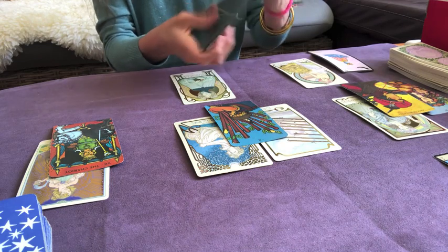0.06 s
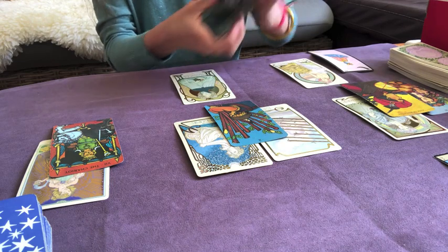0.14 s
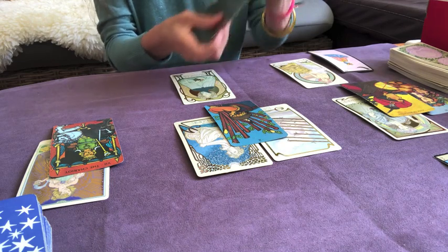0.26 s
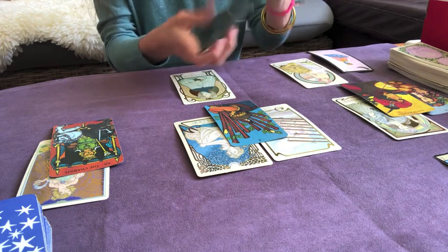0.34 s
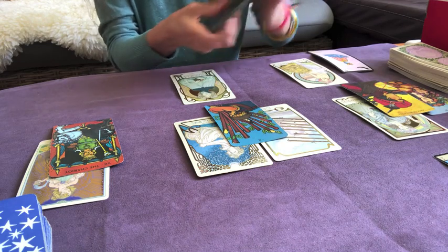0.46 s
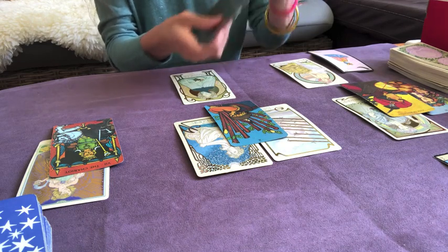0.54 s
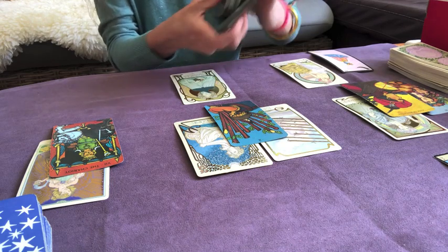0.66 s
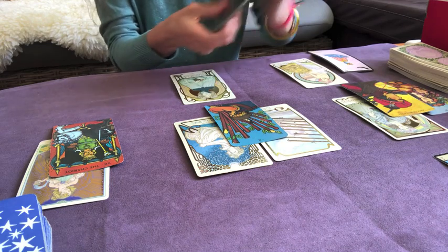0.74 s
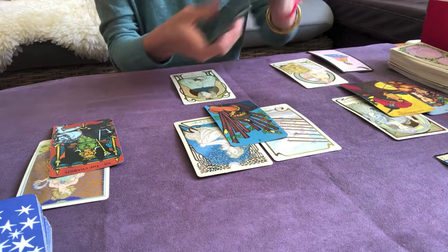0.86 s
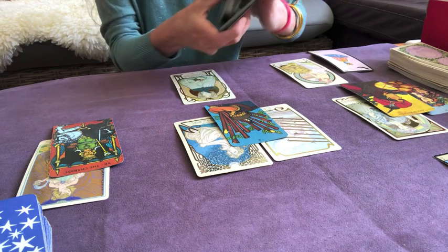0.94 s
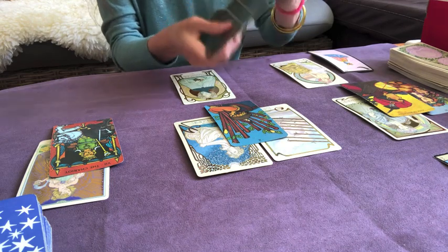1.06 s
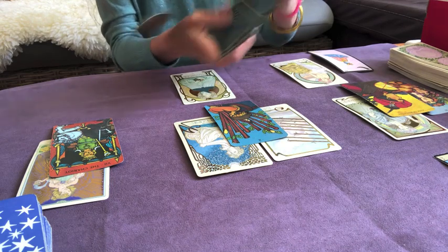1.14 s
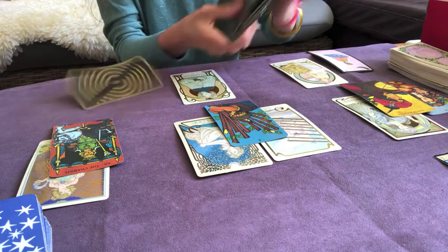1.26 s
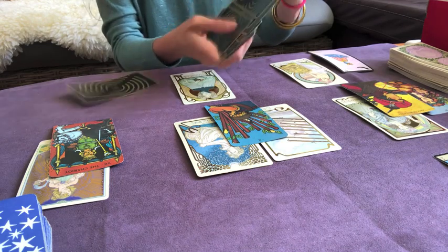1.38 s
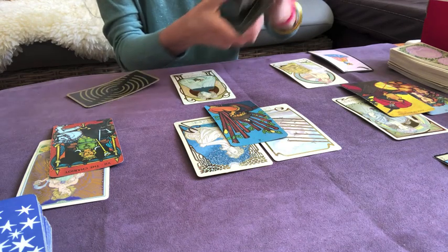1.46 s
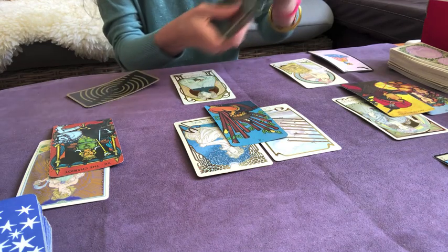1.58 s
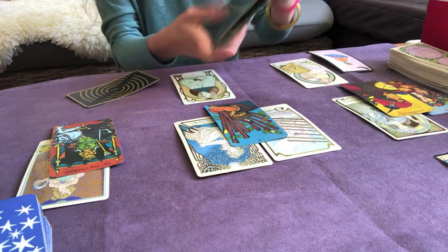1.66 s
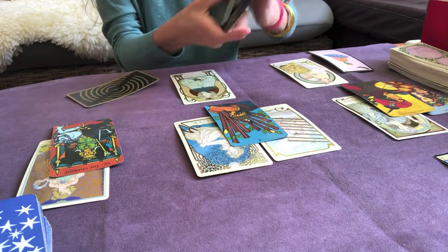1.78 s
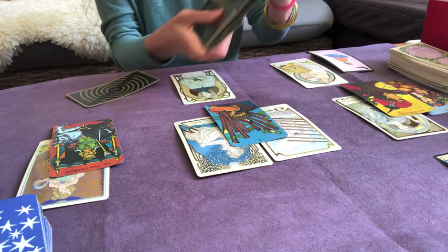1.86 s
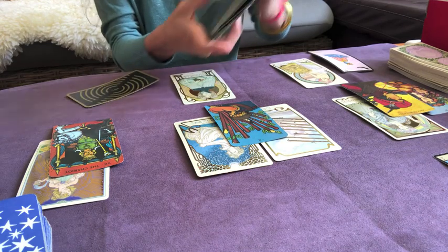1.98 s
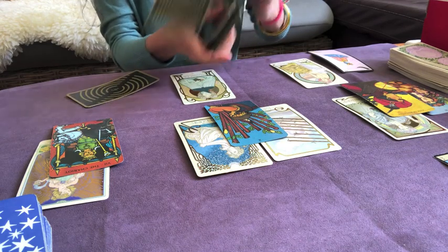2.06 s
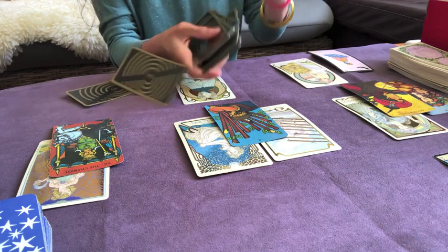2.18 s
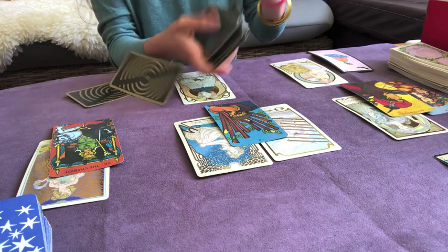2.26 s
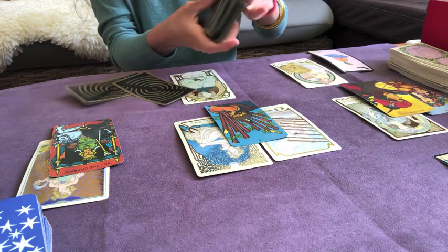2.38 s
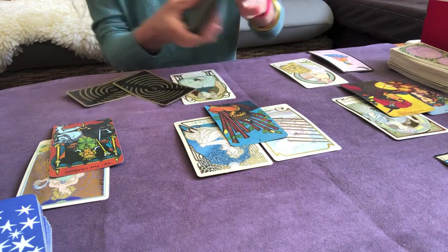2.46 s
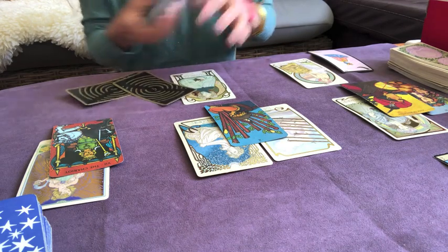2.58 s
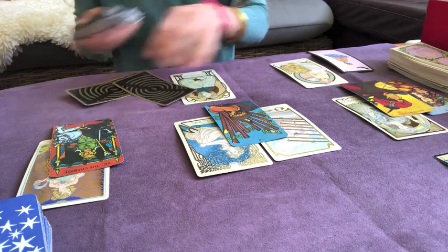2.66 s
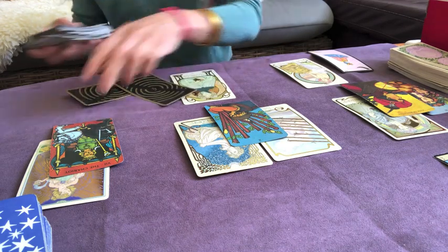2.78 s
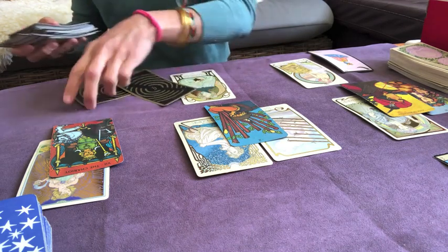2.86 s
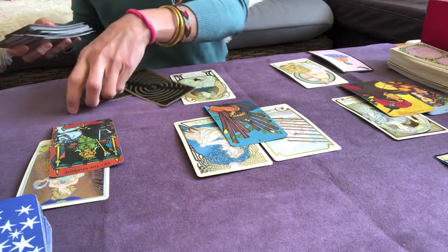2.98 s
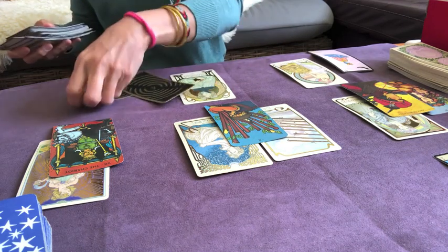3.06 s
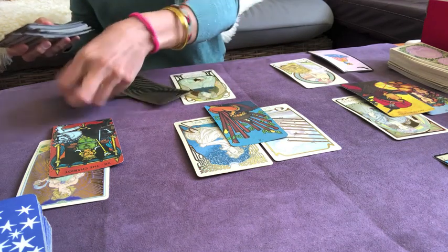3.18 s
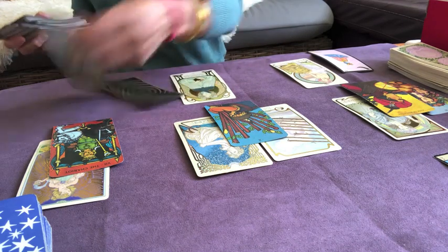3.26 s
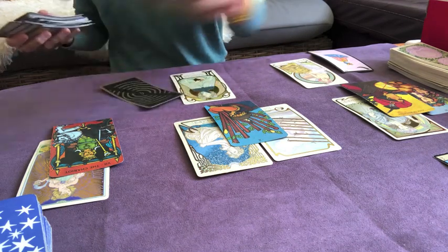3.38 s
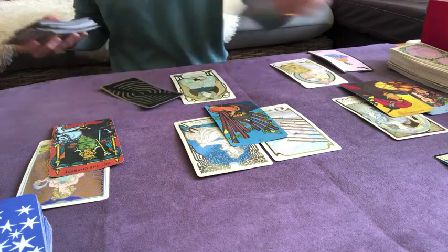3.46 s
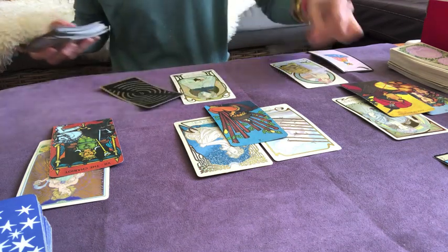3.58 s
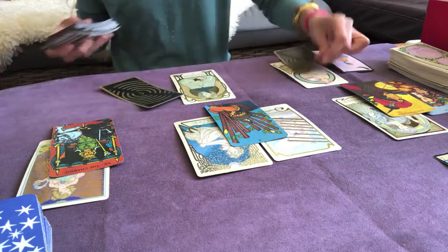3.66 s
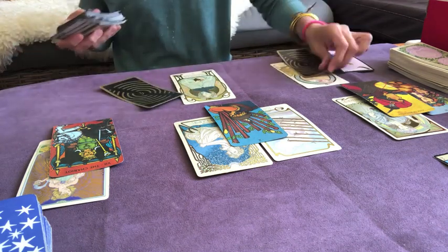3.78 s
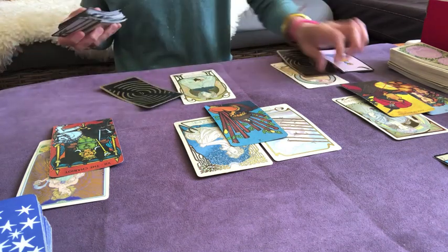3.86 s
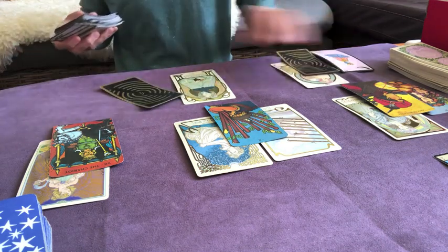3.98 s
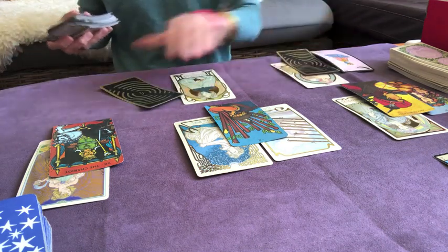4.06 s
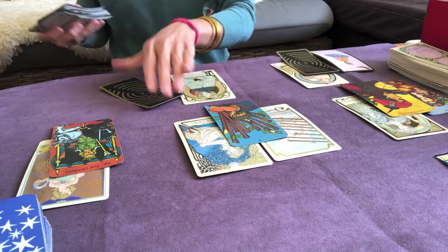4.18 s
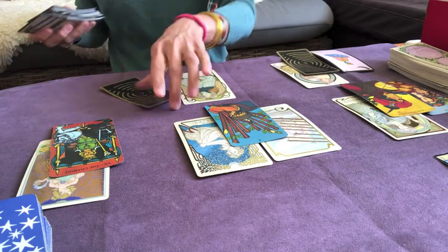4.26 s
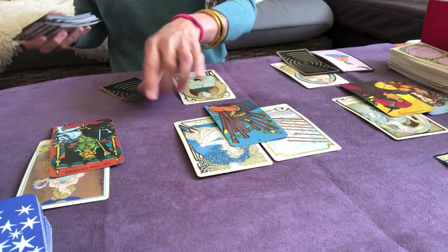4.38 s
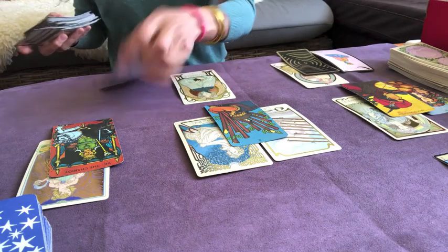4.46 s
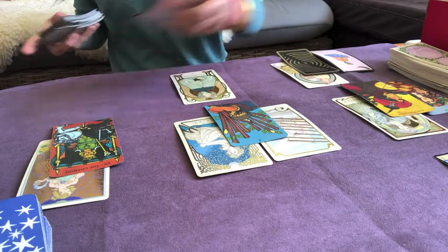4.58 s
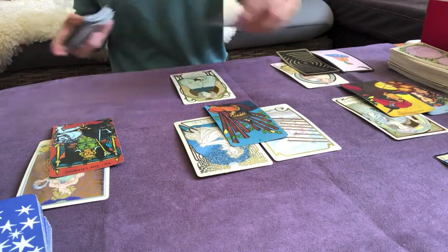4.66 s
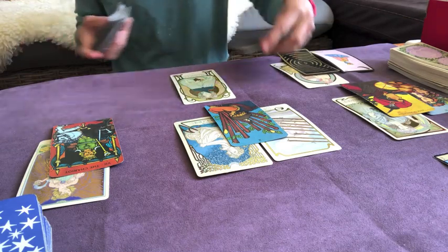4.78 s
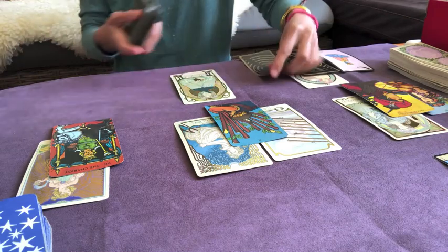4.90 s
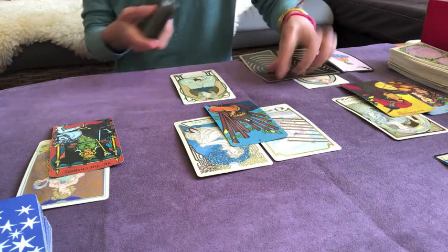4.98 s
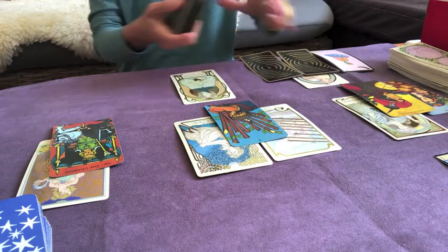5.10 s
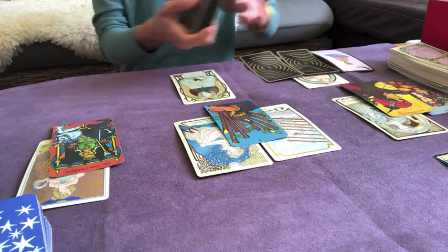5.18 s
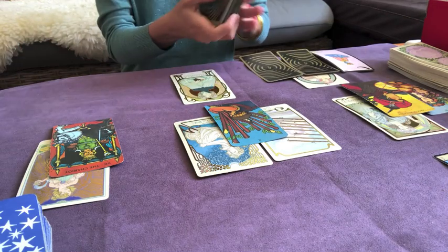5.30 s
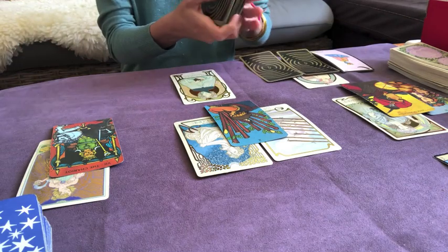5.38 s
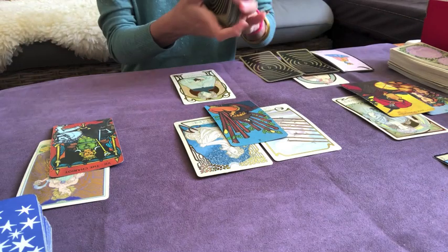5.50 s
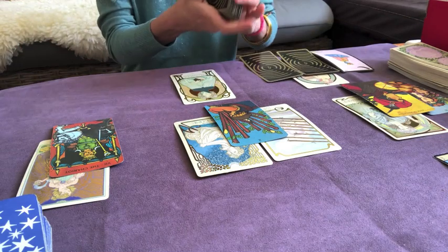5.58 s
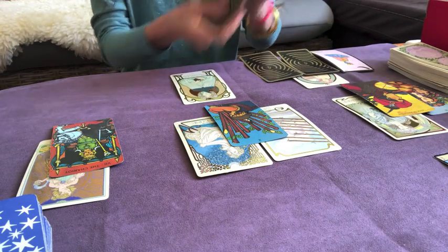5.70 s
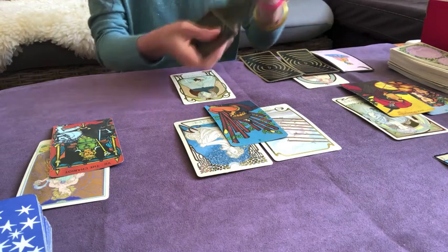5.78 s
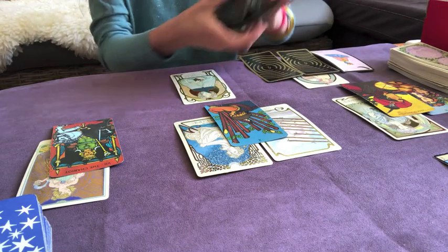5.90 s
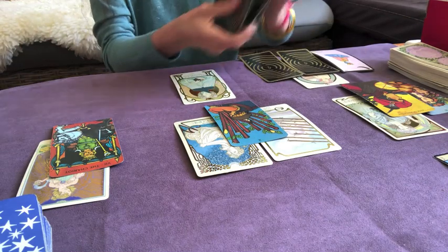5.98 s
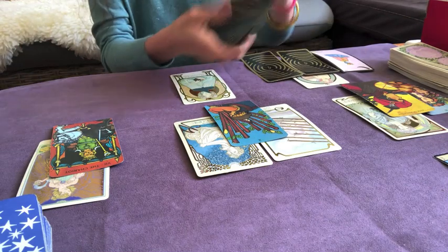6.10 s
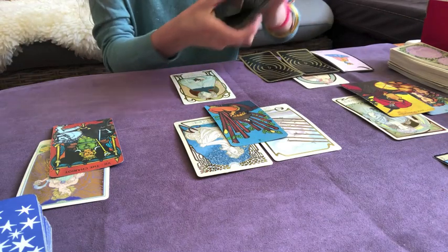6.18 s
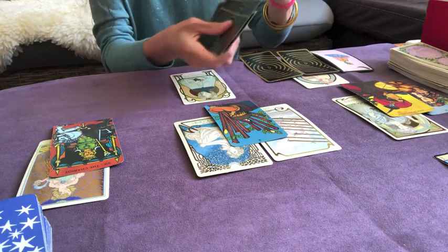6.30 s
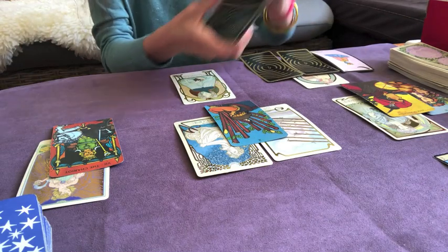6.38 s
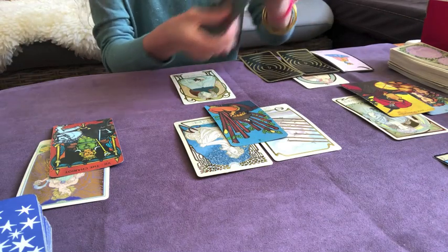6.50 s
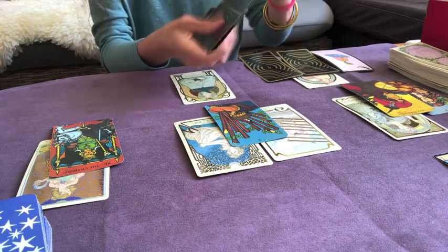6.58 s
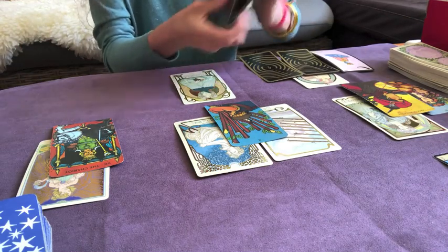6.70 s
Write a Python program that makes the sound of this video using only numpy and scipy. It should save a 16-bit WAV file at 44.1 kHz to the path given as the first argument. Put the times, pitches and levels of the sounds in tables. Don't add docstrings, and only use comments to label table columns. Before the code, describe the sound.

A small nearby microphone catches crisp card packets knocking and edges snapping, with a short soft room response. After a flat slap and a sharp flick, the shuffling stops; fingers tap the cloth, lift cards and set them down gently. Late on, shuffling starts again over a very faint distant engine rumble.

```python
import sys
import numpy as np
from scipy import signal
from scipy.fft import rfft, irfft
from scipy.io import wavfile
from scipy.ndimage import uniform_filter1d

SR = 44100
rng = np.random.default_rng(int(sys.argv[2]) if len(sys.argv) > 2 else 0)


def ratio_of_db(decibels):
    return 10 ** (np.asarray(decibels, float) / 20)


def dump(signal):
    limited = np.clip(np.atleast_2d(signal).T, -1, 1)
    pcm = np.round(limited * 32767).astype(np.int16)
    wavfile.write(sys.argv[1], SR, pcm)


N = 297234


def rms_one(x):
    return x / np.sqrt(np.mean(x ** 2) + 1e-20)


def at_hz(points, hz):
    points = np.array(points)
    return np.interp(np.log(hz), np.log(points[:, 0]), points[:, 1])


def butter(x, hz, kind):
    return signal.sosfilt(signal.butter(2, hz, kind, fs=SR, output="sos"), x)


def band(x, low_hz, high_hz):
    return butter(x, [low_hz, min(high_hz, 0.45 * SR)], "band")


def ring(x, hz, t60):
    r = ratio_of_db(-60 / (t60 * SR))
    w = 2 * np.pi * hz / SR
    return signal.lfilter([0, np.sin(w)], [1, -2 * r * np.cos(w), r * r], x + 1e-18)


def coloured(x, spectrum):
    hz = np.maximum(np.arange(N // 2 + 1) * SR / N, 10)
    return rms_one(irfft(rfft(x) * ratio_of_db(at_hz(spectrum, hz)), N))


def drift(rate_hz):
    r = np.exp(-2 * np.pi * rate_hz / SR)
    return rms_one(signal.lfilter([1], [1, -2 * r, r * r], rng.standard_normal(N + SR))[SR:])


def whitened(x, bins):
    spectrum = rfft(x)
    return irfft(spectrum / np.sqrt(uniform_filter1d(np.abs(spectrum) ** 2, size=bins)), len(x))


def add(out, s, piece):
    at = round(s * SR)
    out[at:at + len(piece)] += piece[:len(out) - at]


def blows():
    # start in seconds, peak in dB, packet body and edge air in dB re peak.
    knocks = [(0.031, -17.5, -24, -8), (0.045, -25.5, -10.5, -5.5), (0.222, -42.5, -4.5, -29),
              (.492, -35.5, -8.5, -24), (0.571, -30, -9.5, 3.5), (.803, -29.5, -45, -9),
              (1.085, -32.5, -10.5, -1), (1.382, -26, -17, -14.5), (1.635, -38.5, -41, -12),
              (1.833, -42.5, -1, -14), (2.149, -35.5, -6.5, -12), (2.2085, -25.5, -13, -22),
              (2.223, -40, 2.5, -6), (2.404, -43, -12, -6), (5.792, -30.5, -2.5, -18), (5.981, -37, -7, 0),
              (6.029, -34, -21, -11), (6.483, -36, -12, -9), (6.590, -22.5, -23, -15)]
    settles = [(.052, -31, -1.5, 4.5), (.242, -39, -15, -11), (.581, -24.5, -47, -7), (0.845, -33, -11, -3),
               (1.186, -53.5, 4.5, -26), (1.302, -29, -40, -10), (1.538, -41.5, -5.5, -14),
               (1.622, -51.5, 6.5, -20), (1.647, -39, -16, -14), (1.877, -39, -5, -32),
               (2.216, -33, -13, -18.5), (5.804, -27.5, -53, -4), (5.972, -36.5, -15, -3),
               (6.008, -33.5, -24, -15), (6.061, -20.5, -40, -10), (6.073, -27, -21, -17),
               (6.324, -34, -4, 6)]
    claps = [(0.049, -19.5, -16, -40), (.205, -38, -10.5, -2.5), (0.292, -31, -8.5, -1),
             (0.3057, -15.5, -53, -9.5), (0.309, -24, -9.5, -43), (0.51, -41, -27, -12),
             (.543, -25, -19, -14), (0.762, -48, -9, -12.5), (0.837, -31.5, -19.5, -12),
             (1.103, -31.5, -17.5, -36.5), (1.292, -34, -22.5, -25), (1.366, -27.5, -12.5, -6.5),
             (1.76, -43.5, -26.5, -8), (1.785, -43, -23.5, -5.5), (2.129, -40, -2.5, -5),
             (2.142, -26.5, -11.5, -15), (4.961, -45, -13.5, -15), (6.067, -20.5, -13.5, -3.5),
             (6.226, -34, -16, -17), (6.298, -21, -18.5, -45), (6.571, -31.5, -5, 6)]
    snaps = [(.002, -29.5, -9.5, 2), (0.2866, -27.5, -11.5, -24), (0.4771, -32.5, -15, -7),
             (0.565, -27, -11.5, -35), (.735, -32.5, -11.5, -2), (0.978, -41, -9, -4),
             (1.027, -40, -16, -13), (1.069, -33.5, -17, -38), (1.096, -29, -22, -15), (1.515, -60, -39, 0),
             (1.55, -37.5, -17, -8), (1.576, -45, -11, -5), (1.928, -41.5, -39, 2),
             (2.058, -22, -21.5, -37), (2.186, -35.5, -6, -14), (2.4217, -25.5, -12.5, -45),
             (3.094, -32, -5.5, -22), (3.9015, -30.5, -7.5, -10), (4.029, -61.5, -19, 5.5),
             (4.5705, -39.5, -2, -44), (5.477, -56.5, -10, -27.5), (5.7, -49, -37, -17),
             (5.924, -48, -7, 2.5), (5.962, -36.5, -13, -19), (6.282, -39, -8, -2), (6.332, -26, -18, -40),
             (6.529, -40, -9, -3), (6.553, -34.5, -5.5, -38), (6.576, -21, -21, -39),
             (6.727, -36.5, -10, -1.5)]
    picks = [(2.893, -53, -12.5, -3), (2.918, -45.5, -18.5, -25), (2.995, -46, -16, -15),
             (3.048, -53, 0, -7), (3.072, -48, -7, -22), (3.078, -49.5, 3.5, -13), (3.666, -63, 1.5, -25.5),
             (3.754, -49, -12, -16), (3.788, -59, -3, -22.5), (4.321, -53.5, -16, -17),
             (4.388, -52.5, 0.5, -22.5), (4.516, -63, -19, -20), (4.537, -58, -7.5, -13),
             (4.558, -45.5, -0.5, -13.5), (4.576, -40, -3.5, -19), (4.896, -63.5, 7.5, -27),
             (5.022, -36.5, -31, -6)]
    # ring in Hz, contact in ms.
    contact = [
        (1748, 2.4),
        (1600, 3.5),
        (2900, 3.12),
        (4100, 2.9),
        (1780, 3.1),
    ]
    lead_s, ring_spread = 0.008, 0.1
    size = 2048
    out = np.zeros(N + SR)
    t = np.arange(size) / SR - lead_s
    after = np.maximum(t, 0)
    rush = np.exp(np.minimum(t, 0) / 0.003 - after / 0.0025)
    for rows, (ring_hz, ms) in zip([knocks, settles, claps, snaps, picks], contact):
        span = max(ms, 0.3) / 1000
        graze = 0.21 * np.exp(-np.abs(t) / (0.75 * span))
        touch = graze + (1 - np.exp(-after / (60 * span ** 2))) * np.exp(-after / span)
        energy = np.sum(touch ** 2)

        def unit(x):
            return x * np.sqrt(energy / np.sum(x ** 2))

        chance = rng.standard_normal((len(rows), 2, size))
        for (s, peak_db, body_db, air_db), (noise, grain) in zip(rows, chance):
            edges = whitened(noise * ratio_of_db(2 * grain) * touch, 25)
            edges[size // 2:] = 0
            edges *= np.where(t < 0, 70 * span, 1)
            bend = np.exp(ring_spread * noise[0])
            card = unit(band(edges, 2000, 6250)) + 0.79 * unit(ring(edges, ring_hz * bend, 0.0047))
            flex = ring(band(edges, 240, 900), 370 * bend, 0.054)
            thud = band(band(edges, 140, 510), 110, 540)
            packet = unit(band(edges, 410, 1500) + 0.014 * flex) + ratio_of_db(-16.5) * unit(thud)
            packet = np.roll(packet, round(0.0012 * SR))
            hiss = 0.4 * edges.std() * grain * rush / rush.std()
            air = unit(band(edges + hiss, 3900, 15000))
            blow = card + ratio_of_db(body_db + 10.5) * packet + ratio_of_db(air_db + 2) * air
            add(out, s, ratio_of_db(peak_db - 7.5) * blow)
    return out[round(lead_s * SR):][:N]


def slap():
    # frequency in Hz, level in dB, t60 in seconds.
    card_modes = [(484, -15, 0.054), (730, -7.5, 0.03), (1070, -7, 0.025), (1420, -10, .018),
                  (1940, -0.5, 0.011), (2500, -0.5, 0.0055), (3490, -8.5, 0.011), (4700, -11.5, 0.0057),
                  (5500, -15, .006), (7200, -27.5, 0.0087)]
    slap_s, slap_db = 1.2440, -10
    out, t = np.zeros(N), np.arange(4096) / SR
    hit = np.zeros(len(t))
    for late_s, share in [(0.0004, 0.4), (0.0011, 1.29)]:
        hit += share * np.exp(-((t - late_s) / 0.00004) ** 2)
    modes = np.zeros(len(t))
    for k, (hz, db, t60) in enumerate(card_modes):
        modes += ratio_of_db(db - 8.5) * ring(hit, hz, t60) * (-1) ** k
    squeezed_air = band(rng.standard_normal(len(t)), 2500, 7600) * ratio_of_db(-14) * np.exp(-t / 0.0035)
    add(out, slap_s, ratio_of_db(slap_db) * (band(modes, 330, 8500) + squeezed_air))
    return out


def ticks():
    # time of peak in seconds, peak in dB, strongest Hz, length in ms.
    clips = [(.0355, -30, 1520, 2.1), (.0480, -30.5, 2500, 3.2), (.0605, -29, 7150, 1.2),
             (.2910, -36, 6000, 0.9), (.3035, -37, 6500, 2.0), (.3110, -22, 9000, 0.42),
             (.3140, -24.5, 1230, 0.71), (.3175, -38, 6000, 1.3), (.5695, -34.5, 1010, 1.9),
             (.5815, -25, 7900, 0.93), (2.0590, -20, 4530, 1.4), (2.1335, -40, 690, 1.5),
             (2.2095, -28, 4800, 0.75), (2.4042, -41, 6540, 0.45), (2.4092, -40, 6500, .6),
             (2.4285, -39, 4000, 0.67), (3.0795, -41, 2175, 0.75), (3.0945, -29.5, 3370, 0.54),
             (3.8975, -45.5, 5670, 3), (3.9018, -29, 4890, 0.9), (5.7978, -26, 3806, 0.76),
             (5.7995, -26.5, 7200, 0.88), (5.8040, -27.5, 1290, 0.6), (6.0597, -27.5, 3800, 0.87),
             (6.0705, -26.5, 7440, 0.78), (6.0775, -24.5, 1430, 0.99), (6.2988, -20, 6700, 0.41),
             (6.3275, -24.5, 1520, 1.1), (6.3345, -30.5, 5150, 1.5), (6.5530, -29, 3500, 0.41),
             (6.5730, -36, 4500, 1.9), (6.5822, -26.5, 3950, 1.2), (.4772, -22.5, 6200, 0.42),
             (.7645, -43, 3500, 0.68), (.8385, -32.5, 3060, 1.5), (1.1055, -36, 8980, .5),
             (1.1108, -35, 5010, .6), (1.1165, -41.5, 455, 1.5), (1.2985, -33.5, 2500, 2.5),
             (1.3255, -36, 1500, 2), (1.3675, -35, 12540, .8), (1.8328, -30.5, 8000, 0.41),
             (1.9210, -41, 2500, .8), (1.9515, -50, 5000, 1.5), (2.2235, -31, 1910, 1.62),
             (4.3980, -49.5, 1680, 1.0), (4.5705, -28, 3540, 0.46), (4.5780, -35.5, 780, 1.9)]
    # time of peak in seconds, peak in dB,
    # strongest Hz, length in ms.
    more_clips = [(.0820, -35.5, 1600, 2.6), (1.5305, -47, 4000, .8), (1.538, -46, 4480, 0.89),
                  (1.552, -37.5, 3420, 0.74), (1.6175, -38, 3000, 0.89), (1.6245, -52, 900, 1.5),
                  (1.6332, -36.5, 2950, 2.4), (1.637, -49, 9000, 0.61), (1.6460, -33, 3960, 0.71),
                  (1.6520, -41, 7000, .9), (1.6543, -39.5, 510, 1.6), (2.2100, -20.5, 1510, 1.8),
                  (2.4263, -35.5, 498, 1.75), (5.9620, -36, 4960, .6), (6.0100, -37, 4440, 1.2),
                  (6.0775, -32, 7000, .7), (2.152, -42, 297, 4.3), (1.661, -50, 192, 6.0),
                  (3.316, -52, 1100, 3.0), (1.236, -51.5, 1100, 2.0), (6.5908, -38, 5030, 0.42)]
    # time of peak in seconds, rub in dB, length in seconds, strongest Hz.
    whispers = [(3.122, -74, 0.014, 4000), (3.17, -59.5, .022, 5400), (3.285, -59.5, 0.023, 2010),
                (6.531, -45, 0.004, 5000), (0.564, -41, 0.0065, 2950), (0.837, -51, .006, 1700),
                (1.198, -54.5, 0.0079, 595), (1.364, -42, 0.0027, 6940), (1.935, -54, 0.0042, 5530),
                (3.045, -52.5, 0.017, 640), (4.451, -65.5, 0.018, 5000), (4.49, -68, .012, 2210),
                (4.745, -53.5, .006, 4500), (5.045, -55, 0.0097, 550)]
    width, wide_db = 0.25, -4.5
    half = 4096
    out, t = np.zeros(N + SR), np.arange(-half, half) / SR
    drawn_out = [(s, db + 6, hz, 1000 * length) for s, db, length, hz in whispers]
    rows = clips + drawn_out + more_clips
    for (s, peak_db, hz, ms), noise in zip(rows, rng.standard_normal((len(rows), len(t)))):
        burst = noise * np.exp(-(1000 * t / ms) ** 2)
        pitched = rms_one(band(burst, hz / (1 + width), hz * (1 + width)))
        tick = pitched + ratio_of_db(wide_db) * rms_one(band(burst, hz / 4.8, hz * 2.3))
        add(out, s, ratio_of_db(peak_db) * tick / np.abs(tick).max())
    return out[half:][:N]


def rings():
    # time of peak in seconds, peak in dB, mode in Hz, ring in ms.
    flexed = [(.052, -43, 390, 6.7), (.052, -38, 1000, 3.7), (.207, -45, 3380, 2), (0.294, -35, 2670, 2.9),
              (.310, -42, 454, 6), (0.325, -34, 2670, 8), (.567, -35, 3600, 2.6), (.570, -41, 960, 7.2),
              (0.581, -50, 250, 8.1), (.602, -48, 3380, 3), (.745, -50, 350, 6), (.831, -48, 1660, 3),
              (1.105, -48, 300, 6.8), (1.625, -47, 511, 5.5), (1.64, -55, 1040, 3), (1.653, -49, 318, 8),
              (1.878, -47, 3380, 2), (1.967, -53, 2370, 3), (2.059, -27.5, 2800, 2.9),
              (2.059, -24, 4700, 2.4), (2.132, -39, 2370, 2), (2.143, -47, 8200, 1.3),
              (2.189, -42, 1170, 3.4), (2.209, -37, 4520, .8), (2.225, -41.5, 728, 4.5),
              (2.424, -42.5, 647, 3.4), (2.886, -59.5, 6860, 1), (2.958, -61, 819, 4),
              (3.28, -51, 2110, 4.8), (3.293, -55, 1480, 3.8), (3.308, -57, 3800, 3),
              (3.311, -56.5, 340, 7.5), (3.662, -63, 8200, 1), (3.789, -56, 1400, 2.5),
              (3.802, -58.5, 1400, 4), (3.816, -58, 1450, 3.8), (4.400, -43, 199, 13),
              (4.571, -42.5, 2110, 1.7), (4.571, -40, 6860, 0.97), (4.581, -45, 400, 7.9),
              (5.027, -47.5, 7720, 1.17), (5.037, -46.5, 250, 16), (5.964, -50, 1480, 2.4),
              (6.032, -45, 1870, 3), (6.063, -34, 1870, 3.6), (6.469, -53, 1660, 2.2),
              (6.485, -47, 1700, 2), (6.553, -40, 6860, 1.2), (6.582, -40, 330, 9), (2.21, -41, 7140, 1.5)]
    rise, sag = 0.72, 0.04
    lead = 2048
    out, t = np.zeros(N + SR), np.arange(-lead, 6144) / SR
    for s, peak_db, hz, ms in flexed:
        age = 1000 * t / ms
        shape = np.where(t < 0, np.exp(-(age / rise) ** 2), np.exp(-np.abs(age)))
        phase = 2 * np.pi * np.cumsum(hz * (1 - sag * np.tanh(age))) / SR
        add(out, s, ratio_of_db(peak_db) * shape * np.sin(phase))
    return out[lead:][:N]


def flicks():
    # start in seconds, peak in dB, mode in Hz.
    edges = [
        (0.477, -37, 7200),
        (1.303, -33, 5500),
        (1.832, -45, 7200),
        (2.0582, -23.5, 8710),
        (2.209, -21, 1608),
        (3.072, -40, 2377),
        (3.901, -33.5, 7700),
        (4.386, -45.5, 1650),
        (6.065, -35.5, 7680),
        (6.283, -34.5, 5300),
    ]
    out, t = np.zeros(N), np.arange(1024) / SR
    for (s, peak_db, hz), noise in zip(edges, rng.standard_normal((len(edges), len(t)))):
        sung = ring(noise * np.exp(-t / 0.0015), hz, 0.0074)
        add(out, s, ratio_of_db(peak_db) * sung / np.abs(sung).max())
    return out


def slides():
    # time of most pressure in seconds, rub in dB, length in seconds.
    glides = [(0.214, -49.5, 0.0098), (0.267, -55.5, 0.046), (0.566, -56.5, 0.085), (0.756, -53, 0.025),
              (0.995, -56, 0.023), (1.54, -64, 0.024), (1.589, -57, 0.054), (1.926, -55, 0.053),
              (2.14, -47, 0.034), (2.417, -47.5, 0.0095), (2.448, -52, 0.019), (3.169, -69.5, 0.026),
              (3.68, -71.5, 0.018), (4.375, -72.5, 0.045), (4.432, -71.5, 0.021), (1.27, -54, .018),
              (5.243, -71, 0.056), (5.366, -61, 0.065), (5.561, -66, 0.069), (5.799, -53.5, 0.034),
              (1.33, -57, .02)]
    # time of most pressure in seconds, rub in dB, length in seconds.
    drags = [(0.839, -52.5, 0.038), (1.042, -61, 0.031), (1.102, -46.5, 0.016), (1.645, -46.5, 0.019),
             (1.804, -60.5, 0.038), (1.837, -67.5, 0.073), (1.984, -58, 0.016), (2.96, -65, 0.033),
             (3.06, -70.5, 0.056), (3.243, -66.5, 0.04), (3.431, -76.5, 0.025), (3.811, -68, 0.043),
             (4.544, -66.5, 0.055), (4.957, -62.5, 0.014), (5, -61, 0.021), (5.046, -79.5, 0.02),
             (5.725, -65.5, 0.037), (5.987, -53, 0.022), (6.04, -55.5, 0.021), (6.254, -58.5, 0.04),
             (6.313, -47, 0.013), (6.503, -60, 0.049), (6.585, -48, 0.029)]
    # release in seconds, rub in dB, length in seconds, dullness in dB.
    pulls = [
        (1.365, -44, 0.016, -16),
        (2.052, -55, 0.012, 4),
        (3.307, -57.5, 0.024, 12),
        (4.748, -50.5, .013, 2),
    ]
    # frequency in Hz, density in dB per Hz.
    rub = [(120, -17.5), (400, -7), (1200, -5.5), (2500, -3), (5000, -4), (8000, -9), (16000, -14.5)]
    strokes = [(*row, 0.1, 0.45) for row in glides]
    strokes += [(*row, 8, 0.72) for row in drags]
    strokes += [(*row, 0.24) for row in pulls]
    t, bright, dull = np.arange(N) / SR, np.zeros(N), np.zeros(N)
    for s, rub_db, length, dull_db, fall in strokes:
        stroke = ratio_of_db(rub_db) * np.exp(-((t - s) / np.where(t < s, length, fall * length)) ** 2)
        bright += stroke
        dull += ratio_of_db(dull_db) * stroke
    grains = ratio_of_db(2 * drift(250) + 1.5 * drift(40))
    card, cloth = rng.standard_normal((2, N)) * grains
    card = band(coloured(card, rub), 2600, 15000)
    cloth = band(coloured(cloth, rub), 120, 2100)
    return bright * card + dull * cloth


def thumps():
    # start in seconds, peak in dB, knuckle and palm in dB re peak.
    landings = [(1.245, -18, -4, -29.5), (2.058, -49.5, 14.5, -25), (2.143, -46, -4, -34),
                (2.224, -35, -7.5, -21), (2.424, -47.5, 20, -31), (2.906, -53.5, 0.5, -3),
                (2.918, -59.5, -18.5, -5.5), (2.948, -53.5, -7, -12), (2.977, -48, -12, -16),
                (2.994, -45.5, -2, -10), (3.011, -53, -2, -22), (3.046, -57.5, 23, -8),
                (3.076, -26, -29.5, -20), (3.096, -24.5, -9.5, -23.5), (3.120, -34.5, -4, -20),
                (3.903, -36.5, -11.5, -14.5), (3.923, -45, -21.5, -15), (4.385, -40, -20, -15),
                (4.403, -53, -16, -22.5), (4.571, -42, 8, -20.5), (5.029, -35.5, -0.5, -20.5),
                (5.041, -40, -8, -23), (5.795, -43.5, -7, -20.5)]
    # frequency in Hz, level in dB, twice the t60 in seconds.
    table_modes = [(177, -10.5, 0.3), (208, -1.5, 0.14), (257, -3.5, 0.17), (326, -9, 0.16),
                   (390, -6.5, 0.13), (520, -5, 0.22)]
    s, peak_db, knuckle_db, palm_db = np.transpose(landings)
    at = [round(start * SR) for start in s]
    modes, push = np.zeros(N), np.zeros(N)
    chance_db = 2 * rng.standard_normal((len(at), len(table_modes)))
    for k, (hz, level_db, t60) in enumerate(table_modes):
        push[at] = ratio_of_db(peak_db + level_db - 7.5 + chance_db[:, k])
        modes += ring(push, hz, 0.5 * t60) * (-1) ** k
    push[at] = ratio_of_db(peak_db + palm_db - 7.5)
    palm = ring(band(push, 95, 190), 126, 0.04) * ratio_of_db(22.5)
    push[at] = ratio_of_db(peak_db + knuckle_db)
    knuckle = ring(band(push, 400, 1000), 730, 0.0078)
    return band(band(modes, 130, 390) + palm + knuckle, 120, 1200)


def echoes():
    # frequency in Hz, t60 in seconds.
    room_t60 = [(100, 0.46), (500, 0.31), (2000, 0.36), (6000, 0.28), (15000, 0.29)]
    first_wall_s = 0.0085
    t, edges = np.arange(SR // 2) / SR, 90 * 2 ** np.arange(0, 8.)
    tail = np.zeros(len(t))
    for white, low_hz in zip(rng.standard_normal((len(edges), len(t))), edges):
        tail += band(white, low_hz, 2 * low_hz) * ratio_of_db(-60 * t / at_hz(room_t60, 0.68 * low_hz))
    tail = band(whitened(tail, 41), 130, 12000)
    tail *= np.clip((t - first_wall_s) / 0.0018, 0.18, 1)
    tail[len(t) * 3 // 4:] = 0
    return tail / np.sqrt(np.sum(tail ** 2))


def room(x):
    room_db, scatter_hz, scatter_from_hz = -13.5, 175, 530
    one, other = (signal.fftconvolve(x, echoes())[:N] for _ in range(2))
    turn = 2 * np.pi * np.cumsum(scatter_hz * drift(60)) / SR
    low = butter(one, scatter_from_hz, "low")
    high = butter([one, other], scatter_from_hz, "high")
    return ratio_of_db(room_db) * (low + high[0] * np.cos(turn) + high[1] * np.sin(turn))


def boom(x):
    boom_db, boom_t60_s = -32.5, 0.32
    t = np.arange(SR) / SR
    tail = band(rng.standard_normal(SR), 270, 440) * ratio_of_db(-60 * t / boom_t60_s)
    tail *= 1 - np.exp(-t / 0.0043)
    return ratio_of_db(boom_db) * signal.fftconvolve(x, tail / np.sqrt(np.sum(tail ** 2)))[:N]


def background():
    # frequency in Hz, density in dB per Hz.
    air_colour = [(41, -34.5), (70, -6), (92, -17), (170, -15), (233, -21.5), (307, -18), (1580, -30.5),
                  (14900, -42.5), (16000, -53)]
    # time in seconds, drone in dB.
    approach = [
        (0, -91.5),
        (1.6, -87.5),
        (2.9, -82.5),
        (3.8, -79.5),
        (4.2, -75),
        (5.0, -70.5),
        (5.5, -70),
        (6.1, -67.5),
        (6.74, -65),
    ]
    air_db, wash_db = -71, -59
    drone_db = np.interp(np.arange(N) / SR, *np.transpose(approach))
    wash_db = wash_db + drone_db - drone_db.max()
    air, engine, road = rng.standard_normal((3, N))
    firing = np.sin(2 * np.pi * np.cumsum(53 + 2.2 * drift(4)) / SR) * ratio_of_db(1.4 * drift(4.3))
    rumble = rms_one(ring(ring(engine, 44, 0.15), 49, 0.15))
    drone = rms_one(firing + 0.23 * rumble)
    wash = rms_one(band(road, 200, 480) + 0.3 * band(road, 600, 1200)) * ratio_of_db(1.6 * drift(8))
    return ratio_of_db(air_db) * coloured(air, air_colour) + ratio_of_db(drone_db + 7.5) * drone + ratio_of_db(wash_db - 6) * wash


def scene():
    hands = blows() + rings() + slides() + flicks() + ticks()
    flung, table = slap(), thumps()
    far = hands + ratio_of_db(-3) * flung
    answer = room(far + ratio_of_db(-3) * table) + boom(far + table)
    return (hands + flung + table + answer + background())[None]


def low_pass(x):
    return signal.sosfilt(signal.butter(12, 16670, fs=SR, output="sos"), x)


def record(dry):
    heard = butter(dry, 75, "high")
    heard = signal.sosfilt(signal.cheby2(8, 20, 16100, fs=SR, output="sos"), heard)
    return low_pass(heard)


dry = scene()
out = record(dry)
dump(out)
```